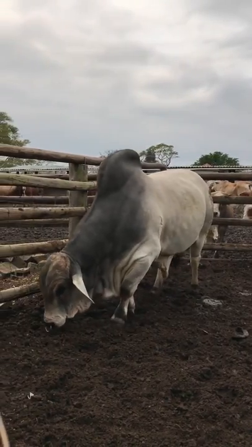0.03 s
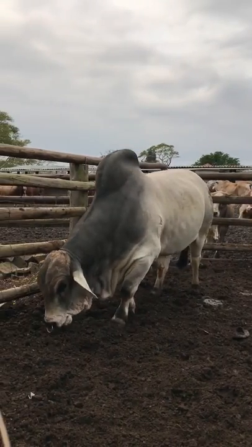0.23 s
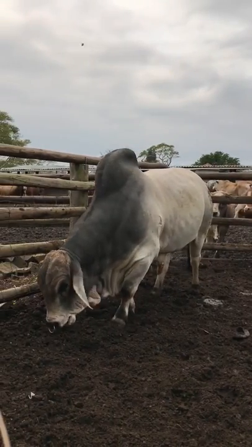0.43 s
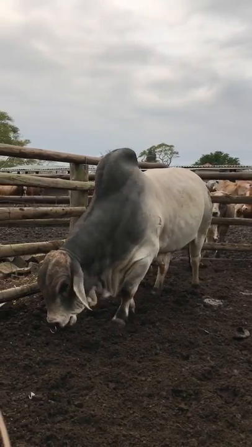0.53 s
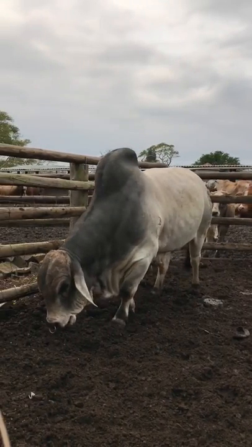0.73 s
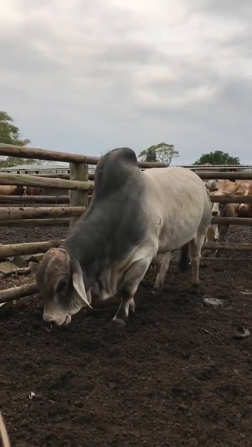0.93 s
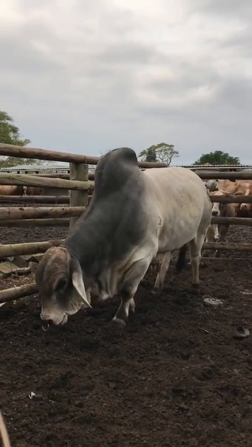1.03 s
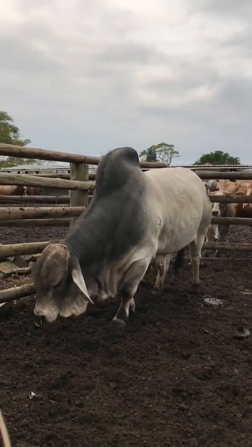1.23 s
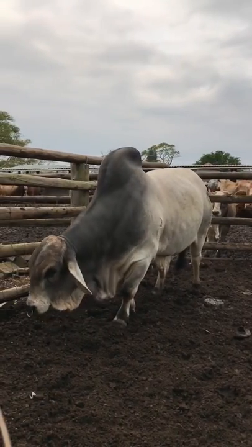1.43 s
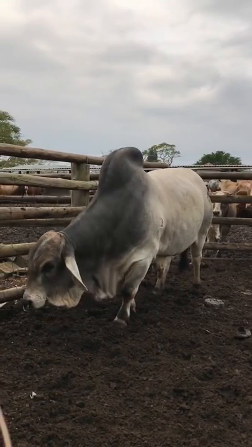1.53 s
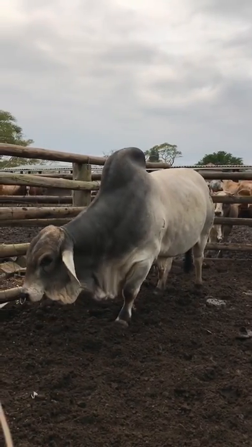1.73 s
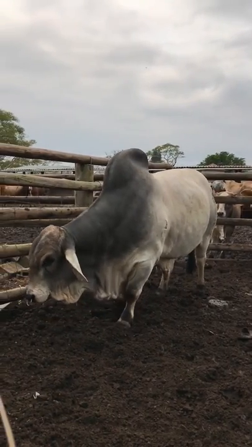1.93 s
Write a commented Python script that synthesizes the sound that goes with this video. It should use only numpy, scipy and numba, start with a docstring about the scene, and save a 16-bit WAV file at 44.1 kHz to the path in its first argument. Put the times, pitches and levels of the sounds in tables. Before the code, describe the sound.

A large bull grunts and snorts close by in an outdoor pen. A short rough grunt comes at about 0.2 seconds, with a quick sniff at 0.4. From 0.5 a long, low snort flutters through the nostrils, loudest and wetly spluttering near 0.9, then turning ragged and airy and fading by 1.4. A distant small bird chirps faintly, mostly near the end, over a soft low rumble.

```python
"""A short rough grunt, a quick sniff, then a long fluttering snort: a big bull in an open pen.
Voice pulses ring his throat and mouth. His nostrils flap 60-85 times a second and ring the nose;
the flapping turns ragged and dissolves into rushing air.
A small bird twitters far off over a faint low rumble."""
import sys
import numpy as np
from scipy import signal
from scipy.fft import rfft, irfft
from scipy.io import wavfile
from scipy.ndimage import uniform_filter1d
from numba import njit

SR = 44100
rng = np.random.default_rng(int(sys.argv[2]) if len(sys.argv) > 2 else 0)


def bounce(signal):
    """Save signal as a 16-bit WAV file at the path given by the first command-line argument."""
    frames = np.transpose(np.atleast_2d(signal))
    limited = np.clip(frames, -1, 1)
    pcm = np.round(limited * 32767).astype(np.int16)
    wavfile.write(sys.argv[1], SR, pcm)


N = 88200

# rasp spectrum of the tight nasal passages (frequency [Hz], level [dB])
TIGHT_RASP_SPECTRUM = [(200, -8), (320, -13), (470, 8), (610, -3), (690, 2.5), (780, -6), (950, 4.5),
                       (1060, -11.5), (1250, -7), (1480, -3.5), (1620, -11.5), (1790, -9), (1950, -35),
                       (2800, -26.5), (4500, -19.5)]


def undb(db):
    """Decibels to gain."""
    return 10 ** (np.asarray(db) / 20)


def curve(table, column):
    """Table column, linearly interpolated in time."""
    rows = np.array(table, float)
    return np.interp(np.arange(N) / SR, rows[:, 0], rows[:, column])


def swell(table, column):
    """Gain from a dB column, fading fast outside its span."""
    t = np.arange(N) / SR
    outside_s = np.maximum(table[0][0] - t, 0) + np.maximum(t - table[-1][0], 0)
    return undb(curve(table, column)) * np.exp(-outside_s / 0.0068)


def noise():
    """White noise."""
    return rng.standard_normal(N)


def even(x, size=2000):
    """Level to a running rms near 1, keeping the fast grain."""
    power = uniform_filter1d(uniform_filter1d(x * x, size), size)
    return x / np.sqrt(np.abs(power) + np.mean(x * x) / 400)


def colour(x, spectrum):
    """Minimum-phase filter through (Hz, dB) points, falling 40 dB/octave beyond the ends."""
    hz, db = np.array(spectrum, float).T
    octave = np.log2(np.maximum(np.fft.rfftfreq(2 * N, 1 / SR), 1))
    beyond = np.maximum(np.log2(hz[0]) - octave, 0) + np.maximum(octave - np.log2(hz[-1]), 0)
    gain_db = np.maximum(np.interp(octave, np.log2(hz), db) - 40 * beyond, -90)
    cepstrum = irfft(np.log(undb(gain_db)))
    cepstrum[1:N] *= 2
    cepstrum[N + 1:] = 0
    return irfft(rfft(x, 2 * N) * np.exp(rfft(cepstrum)))[:N]


@njit
def svf(x, hz, width_hz):
    """State-variable band-pass with a moving centre."""
    y, band, low = np.empty(len(x)), 0., 0.
    for i in range(len(x)):
        g, damping = np.tan(np.pi * hz[i] / SR), width_hz / hz[i]
        v = (band + g * (x[i] + 1e-18 - low)) / (1 + g * (g + damping))
        band, low, y[i] = 2 * v - band, low + 2 * g * v, damping * v
    return y


def ring(x, hz, *widths_hz):
    """Resonance: one band-pass in series per width."""
    for width_hz in widths_hz:
        x = svf(x, hz * np.ones(N), float(width_hz))
    return x


def cavity(x, modes):
    """Parallel steep-skirted resonances from (Hz, nominal width Hz, dB) rows."""
    return even(sum(undb(db) * ring(x, hz, 0.93 * width, 0.95 * width) for hz, width, db in modes))


def flaps(start_s, rate_hz, jitter, shimmer_db):
    """Uneven pulse train, and the cycles elapsed since each pulse."""
    pulses, age, at_s = np.zeros(N), np.full(N, 10.), start_s
    for stretch, size in rng.standard_normal((500, 2)):
        i = int(at_s * SR)
        if i >= N:
            break
        pulses[i] = undb(shimmer_db * size)
        span = age[i:i + SR // 20]
        span[:] = np.arange(len(span)) * rate_hz[i] / SR
        at_s += np.exp(jitter[i] * stretch) / rate_hz[i]
    return pulses, age


def chop(age, leak, attack_cycles, decay_cycles):
    """Airflow: one puff per flap over a steady leak."""
    return leak / 2 + 2 * (1 - leak) * np.exp(-age / decay_cycles) * (1 - np.exp(-age / attack_cycles))


def slacken(tight, slack, span_s=(0.77, 1.115)):
    """Equal-power crossfade as the nostrils go slack."""
    share = np.interp(np.arange(N) / SR, span_s, (0, 1))
    return even(np.sqrt(1 - share) * even(tight) + np.sqrt(share) * even(slack))


def snort():
    """Each nostril flap thumps, rings the nose and lets out a puff; slack nostrils leak steady air."""
    # nostril motion (time [s], flap rate [Hz], period jitter [ratio], nose resonance [Hz], leak [0-1])
    flutter = [(.51, 60.4, 0.01, 198, 0.33), (.535, 61.8, 0.01, 194, 0), (.555, 69.3, 0, 198, 0),
               (.59, 61.5, 0, 199, 0.13), (.69, 64, 0, 198, 0.23), (.76, 84.3, 0.08, 184, 0.34),
               (.89, 71, .07, 206, 0.64), (1.0, 74, .16, 217, 0.62), (1.12, 65.7, 0.24, 203, 0.56),
               (1.35, 64.8, 0.26, 206.2, 0.81)]
    # low envelopes (time [s], thump [dB], nose ring [dB])
    low_levels = [(.47, -56, -64), (.486, -30, -40.5), (.545, -58, -36.5), (.572, -58, -30.5),
                  (.675, -51, -29), (.72, -36, -28.5), (.885, -30.5, -18), (.986, -33.5, -23.5),
                  (1.06, -34, -26.5), (1.15, -30, -28), (1.3, -46.5, -38.5), (1.464, -53, -62.5),
                  (1.52, -71, -72)]
    # air envelopes (time [s], rasp [dB], hiss [dB])
    air_levels = [(.49, -50, -62), (.505, -45, -43), (.55, -37, -48), (.585, -35.5, -48.5),
                  (.64, -42, -49.5), (.69, -37.5, -45), (.71, -33.5, -42.5), (.77, -35.5, -39),
                  (.82, -27.5, -39.5), (.905, -30, -39), (.94, -32.5, -38.5), (1.0, -32.5, -37.5),
                  (1.16, -33.5, -40), (1.25, -33, -45), (1.325, -35, -55), (1.364, -53.5, -71),
                  (1.42, -77, -71)]
    # throaty ring in the first flaps (time [s], level [dB])
    honk_levels = [(.5, -61), (.55, -44.5), (.61, -59), (.66, -59)]
    # spectra of slack nose, slack passages and nostril hiss (frequency [Hz], level [dB])
    slack_nose_spectrum = [(60, -49), (105, 1), (135, 2.5), (200, 0), (268, 2), (305, -9), (345, -17),
                           (700, -69)]
    slack_rasp_spectrum = [(250, -15), (340, -11), (450, -1), (570, 2), (635, -6.5), (730, 1.5), (860, 7),
                           (965, 2), (1050, -8.5), (1280, -0.5), (1530, -10.5), (1920, -10), (2300, -15.5),
                           (3000, -27), (4000, -41)]
    hiss_spectrum = [(1900, -6.5), (2550, -5.5), (2950, -2), (4300, -5.5), (6030, -0.5), (7680, -9.5),
                     (9120, -10.5), (9860, -16.5), (12200, -10.5), (15500, -23.5)]
    nose_width_hz, thump_hz, thump_width_hz = 25.5, 74, 55
    chest_mode, honk_mode = (144, 40, 0), (1808, 61, 0)

    rate_hz, jitter, nose_hz, leak = (curve(flutter, column) for column in (1, 2, 3, 4))
    pulses, age = flaps(0.5, rate_hz, jitter, shimmer_db=1.6)
    pulses = even(pulses)
    flow = chop(age, leak, attack_cycles=0.14, decay_cycles=0.4)
    push = pulses + 0.42 * even(noise() * flow)
    tight_nose = even(ring(push, nose_hz, nose_width_hz, 300)) + 0.2 * cavity(push, [chest_mode])
    nose = slacken(tight_nose, colour(push, slack_nose_spectrum))
    thump = even(ring(push, thump_hz, thump_width_hz, thump_width_hz))

    sharp_flow = chop(age, 0.99 * leak, attack_cycles=0.054, decay_cycles=0.26)
    slaps = 0.66 * (1 - leak) * colour(pulses, [(100, 0), (1700, 0)])
    puffs = even(noise() * sharp_flow) + slaps
    rasp = slacken(colour(puffs, TIGHT_RASP_SPECTRUM), colour(puffs, slack_rasp_spectrum))
    hiss = even(colour(noise() * flow, hiss_spectrum))
    wet_hiss = even(hiss + undb(-8) * spittle(even(flow)))
    return (cavity(puffs, [honk_mode]) * swell(honk_levels, 1)
            + thump * swell(low_levels, 1) * undb(-0.5)
            + nose * swell(low_levels, 2) * undb(2.1)
            + rasp * swell(air_levels, 1) * undb(-0.35)
            + wet_hiss * swell(air_levels, 2) * undb(-0.72))


def hard_flaps():
    """A nostril slaps shut now and then: a wet splutter and a thud, lower as the nose slackens."""
    # slaps (time [s], thud level [dB], thud frequency [Hz], splutter level [dB])
    slaps = [(.704, -24, 197, -28.5), (.807, -17.5, 205, -24), (0.833, -37, 201, -20.5),
             (.843, -18, 196, -34), (.875, -12, 214, -30), (.901, -11.5, 219, -16.5),
             (.913, -9.5, 200, -30), (1.017, -15, 144, -28), (1.04, -16.5, 142, -34),
             (1.091, -16, 130, -35), (1.127, -12.5, 123, -30), (1.152, -28, 150, -24.5)]
    thud_width_hz, splutter_decay_s = 96, 0.005
    t = np.arange(N) / SR
    thuds, spray, air = np.zeros(N), np.zeros(N), noise()
    for at_s, thud_db, hz, splutter_db in slaps:
        thud = ring(signal.unit_impulse(N, int(at_s * SR)), hz, thud_width_hz, thud_width_hz)
        thuds -= undb(thud_db) * thud / np.abs(thud).max()
        spray += undb(splutter_db) * (t >= at_s) * np.exp(-np.abs(t - at_s) / splutter_decay_s)
    splutter = colour(spray * air, TIGHT_RASP_SPECTRUM) / np.std(colour(air, TIGHT_RASP_SPECTRUM))
    return thuds + splutter


def spittle(flow):
    """Tiny wet ticks, denser in each puff, each ringing one nostril resonance."""
    # nostril resonances (frequency [Hz], level [dB])
    modes = [(3100, -9), (5100, -3), (6100, 0)]
    width_hz, ticks_per_s = 360, 40  # rate per resonance at unit flow
    out = np.zeros(N)
    for hz, db in modes:
        ticks = (rng.random(N) < ticks_per_s * flow / SR) * (1 + rng.random(N))
        out += undb(db) * ring(ticks, hz, width_hz, width_hz)
    return even(out)


def grunt():
    """Rough voice pulses and air ring the throat, then the opening mouth; nasal resonances glide."""
    # voice pitch (time [s], pitch [Hz])
    pitch_path = [(.17, 125.3), (.228, 139), (.255, 185.6), (.30, 191.3), (.325, 198.5), (.36, 187.4),
                  (.42, 184.7)]
    # envelopes (time [s], voice [dB], throat [dB], mouth [dB], hiss [dB])
    levels = [(0.15, -52, -56, -60, -56), (0.182, -47, -48, -52.5, -57), (0.228, -25, -33.5, -58, -43.5),
              (0.29, -29.5, -31, -40, -45), (0.312, -25, -38, -37, -40.5), (0.358, -26, -21.5, -34, -45),
              (0.386, -40, -40.5, -42, -57), (0.414, -54, -46, -63, -56), (0.44, -49, -56, -49.5, -72),
              (0.47, -46, -48.5, -51.5, -54)]
    # tract resonances (frequency [Hz], nominal width [Hz], level [dB])
    throat_modes = [(404, 102, 0), (557, 34.5, 1)]
    mouth_modes = [(764.6, 60, 3.5), (973, 91, 0.5), (1163, 51, -0.5), (1444, 94, -1.5), (2104, 120, -9.5),
                   (2610, 280, -13)]
    # breath hiss (frequency [Hz], level [dB])
    hiss_spectrum = [(2600, -3), (3500, -21), (4800, 1), (6000, 7.5), (7300, -2), (9500, -10.5),
                     (13000, -3.5), (15500, -27)]
    # nostril whistles (start [Hz], middle [Hz], end [Hz], width [Hz], level [dB])
    nostril_modes = [(3880, 3580, 3350, 270, 1), (4530, 4120, 4050, 330, -1.5), (6640, 6060, 6650, 670, 5)]
    # notches cut by the nose's side cavities (start [Hz], middle [Hz], end [Hz], width [Hz])
    notches = [(2000, 1650, 1900, 280), (4900, 5300, 4300, 300)]
    voice_width_hz, glide_s = 135, (0.24, 0.294, 0.34)

    t = np.arange(N) / SR
    pitch_hz = curve(pitch_path, 1)
    pulses, age = flaps(pitch_path[0][0], pitch_hz, jitter=np.full(N, 0.038), shimmer_db=5)
    air = even(noise() * (0.5 + np.exp(-age / 0.5)))
    source = even(pulses) + air
    fundamental = ring(source, pitch_hz, voice_width_hz)
    voice = even(ring(fundamental, 1.1 * pitch_hz, voice_width_hz))
    whistle = np.zeros(N)
    for *path_hz, width_hz, db in nostril_modes:
        whistle += undb(db) * even(ring(noise(), np.interp(t, glide_s, path_hz), width_hz, 2 * width_hz))
    hiss = even(even(colour(air, hiss_spectrum)) + 1.589 * even(whistle))
    out = (voice * swell(levels, 1) * undb(1.1)
           + cavity(source, throat_modes) * swell(levels, 2) * undb(0.6)
           + cavity(source, mouth_modes) * swell(levels, 3) * undb(1.8)
           + hiss * swell(levels, 4) * undb(-0.4))
    for *path_hz, width_hz in notches + notches:  # twice, for depth
        out -= ring(out, np.interp(t, glide_s, path_hz), width_hz)
    return out


def sniffs():
    """Short bright draughts through the nostrils."""
    # draughts (peak time [s], attack [s], release [s], level [dB])
    draughts = [(.175, 0.0056, 0.0082, -45.5), (.417, 0.021, 0.013, -41.5)]
    # nostril air (frequency [Hz], level [dB])
    spectrum = [(590, -39), (1000, -5.5), (5340, 1), (9800, -11), (15500, -12)]
    t = np.arange(N) / SR
    flow = sum(undb(db) * np.exp(-((t - at_s) / np.where(t < at_s, attack_s, release_s)) ** 2)
               for at_s, attack_s, release_s, db in draughts)
    return flow * even(colour(noise(), spectrum))


def bird():
    """Distant falling chirps and thin whistles, slightly unsteady in pitch."""
    # chirps (time [s], length [s], start [Hz], level [dB])
    chirps = [(.117, .016, 4790, -55), (1.839, .014, 4650, -58), (1.872, 0.014, 4730, -57.5),
              (1.908, .016, 4760, -58), (1.945, 0.027, 4870, -57.5)]
    # whistles (time [s], length [s], start [Hz], end [Hz], level [dB])
    whistles = [(1.421, 0.037, 1730, 1640, -55), (1.96, .026, 4150, 3850, -61)]
    chirp_end_hz, warble_depth = 4220, 0.014
    warble = 1 + warble_depth * even(ring(noise(), 150, 250))
    notes = [(at_s, length_s, start_hz, chirp_end_hz, db) for at_s, length_s, start_hz, db in chirps]
    out = np.zeros(N)
    for at_s, length_s, start_hz, end_hz, db in notes + whistles:
        progress = np.clip((np.arange(N) / SR - at_s) / length_s, 0, 1)
        hz = (start_hz + (end_hz - start_hz) * progress) * warble
        out += undb(db) * np.sin(np.pi * progress) * np.sin(2 * np.pi * np.cumsum(hz) / SR)
    return out


def yard():
    """Low outdoor rumble and a faint airy rustle."""
    # background spectra (frequency [Hz], level [dB])
    rumble_spectrum = [(25, -10.5), (80, 4.5), (150, -7), (1500, -23), (3500, -33.5)]
    rustle_spectrum = [(1500, -12), (2200, 0), (5000, 6), (8000, -2.5), (15500, -4.5)]
    # envelopes (time [s], rumble [dB], rustle [dB])
    levels = [(0, -52.5, -59), (.15, -48.5, -56.5), (.22, -46, -61), (1.4, -52, -65.5), (1.66, -56, -72.5),
              (1.77, -55.5, -68.5), (1.825, -54, -61), (1.87, -58, -68), (2.0, -58, -69.5)]
    rumble = even(colour(noise(), rumble_spectrum), size=6000)
    rustle = even(colour(noise(), rustle_spectrum))
    return rumble * undb(curve(levels, 1)) + rustle * undb(curve(levels, 2))


def scene():
    """The bull close by in the open air, mono."""
    return (grunt() + sniffs() + snort() + hard_flaps() + bird() + yard())[None]


def record(dry):
    """Thin the deepest bass and cut the top."""
    bass_cut_hz, top_hz = 42, 15750
    thinned = signal.sosfilt(signal.butter(2, bass_cut_hz, "high", fs=SR, output="sos"), dry)
    return signal.sosfilt(signal.ellip(10, .2, 80, top_hz, fs=SR, output="sos"), thinned)


dry = scene()
out = record(dry)
bounce(out)
```